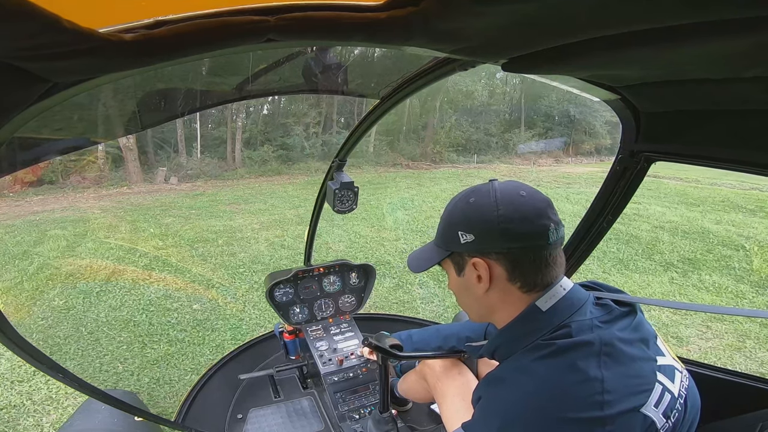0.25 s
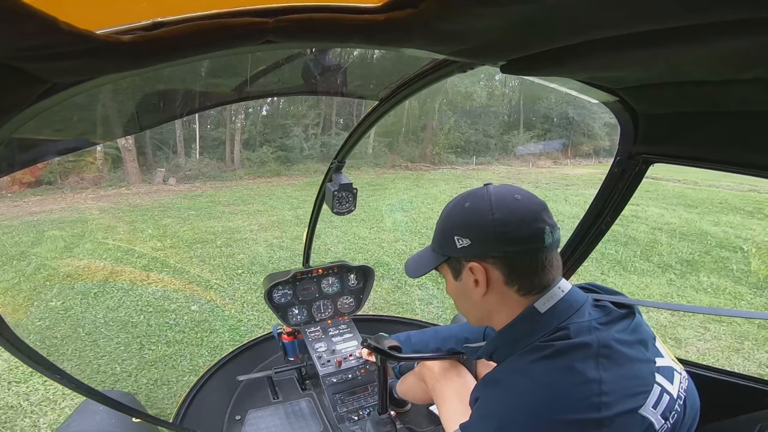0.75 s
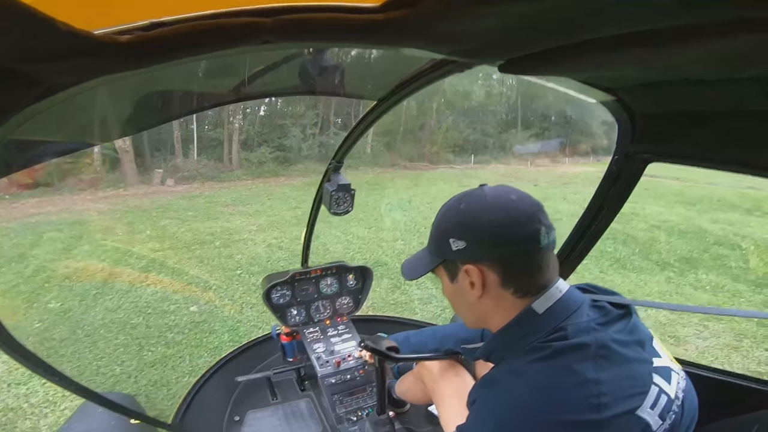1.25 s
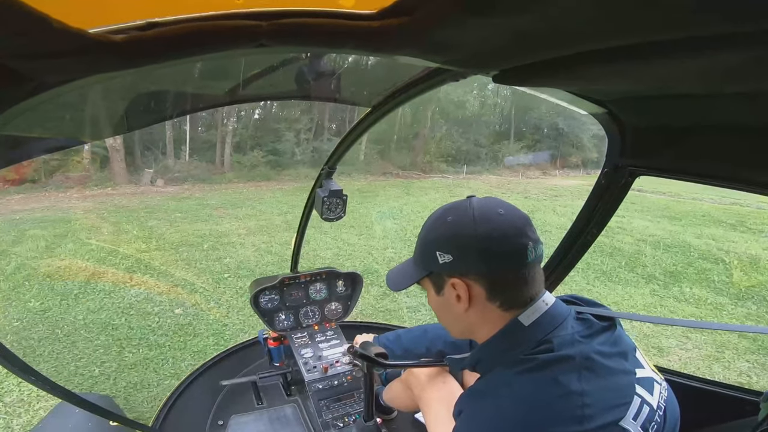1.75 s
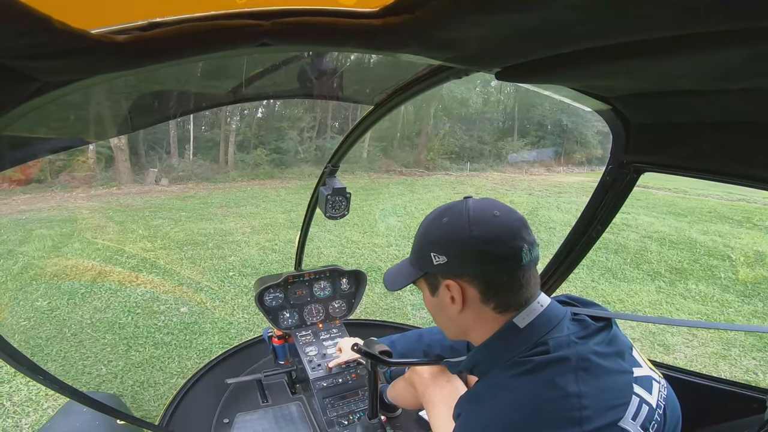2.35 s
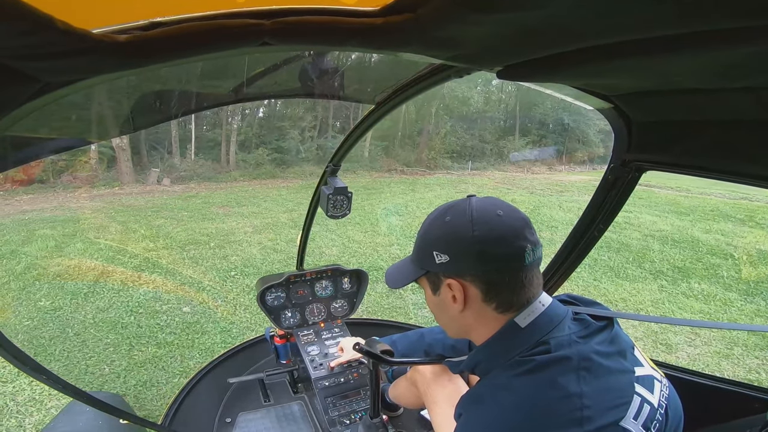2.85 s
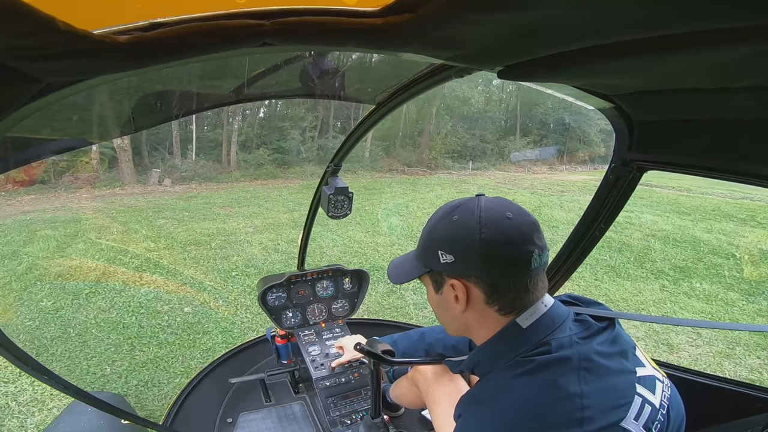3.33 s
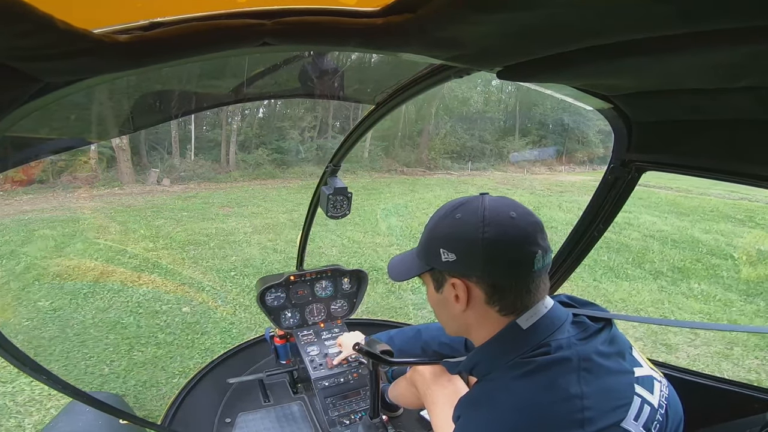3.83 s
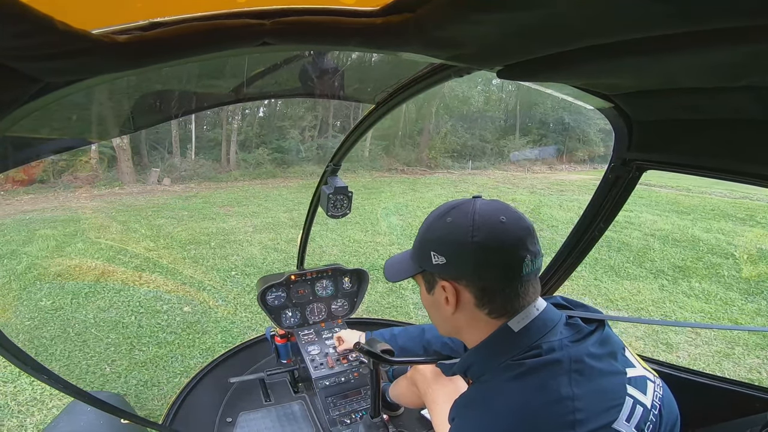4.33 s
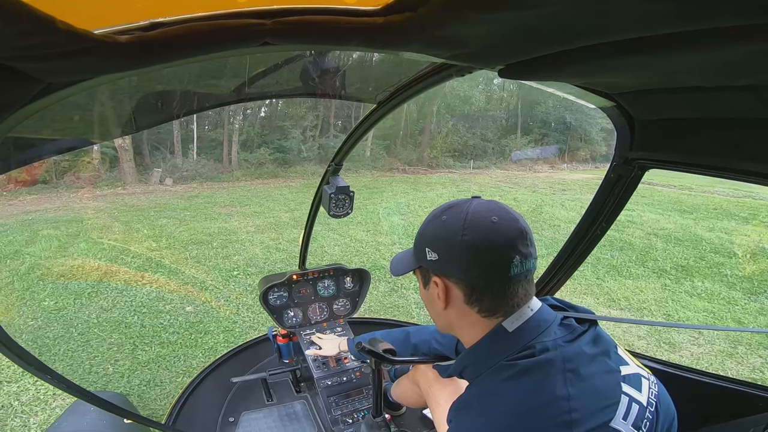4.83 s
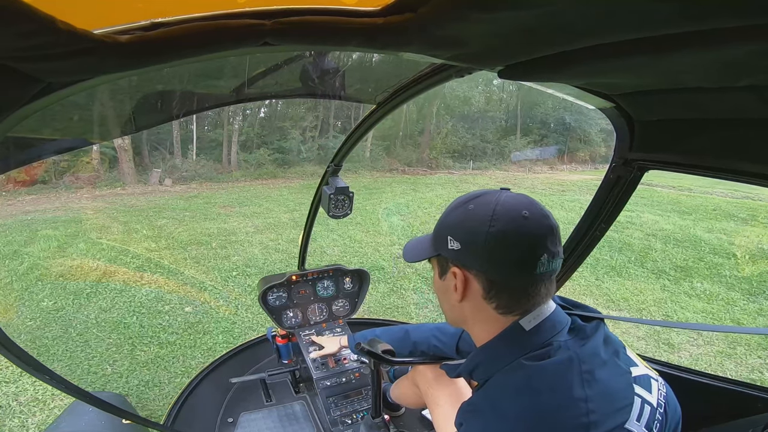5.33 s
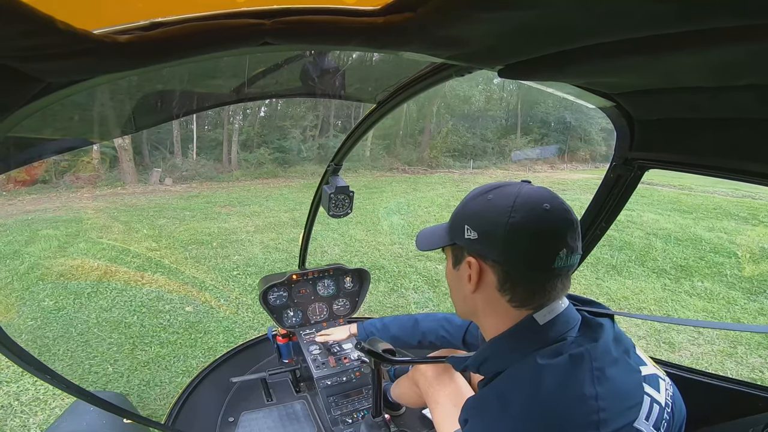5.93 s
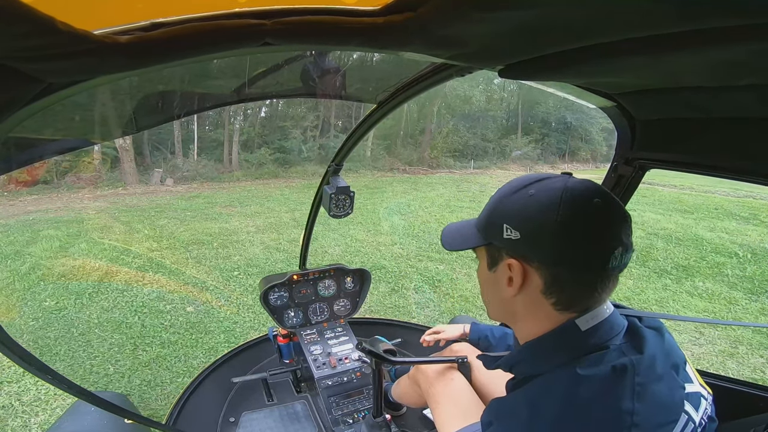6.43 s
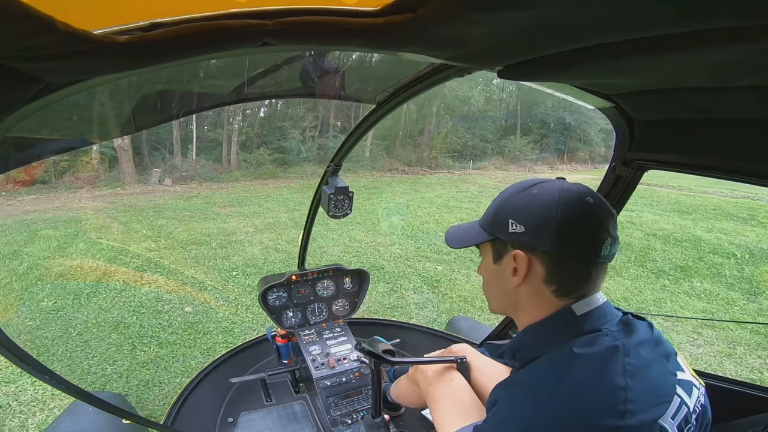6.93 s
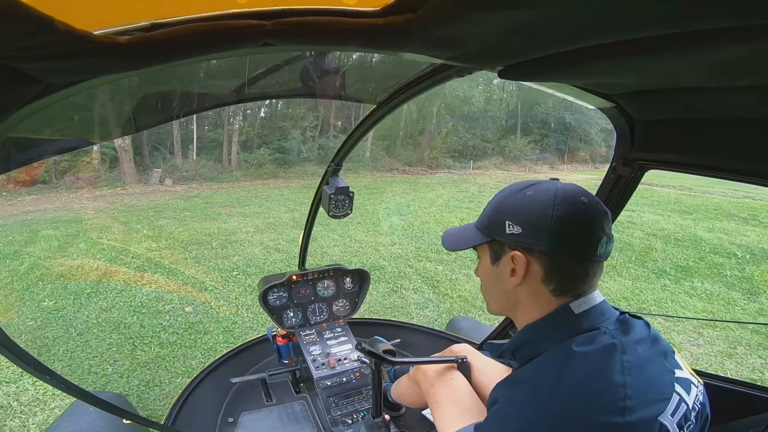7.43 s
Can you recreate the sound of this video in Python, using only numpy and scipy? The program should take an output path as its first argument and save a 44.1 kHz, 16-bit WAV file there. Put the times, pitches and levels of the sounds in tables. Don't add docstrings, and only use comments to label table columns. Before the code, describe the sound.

Inside a small helicopter cabin, a starter grinds through uneven thumping firings, then the piston engine catches into a droning, rattling idle with switch snaps.

```python
import sys
import numpy as np
from scipy import signal
from scipy.fft import rfft, irfft
from scipy.io import wavfile
from scipy.ndimage import uniform_filter1d

SR = 44100
rng = np.random.default_rng(int(sys.argv[2]) if len(sys.argv) > 2 else 0)


def waveform_to_disk(signal):
    frames = np.transpose(np.atleast_2d(signal))
    scaled = np.clip(frames, -1, 1) * 32767
    samples = np.round(scaled).astype(np.int16)
    wavfile.write(sys.argv[1], SR, samples)


def convert_level_to_amplitude(level_db):
    exponent = np.asarray(level_db, float) / 20
    return 10 ** exponent


N = 338688
FREQ = np.arange(N // 2 + 1) * SR / N
TIME = np.arange(N) / SR
EARLY = TIME[:3 * SR]
TOP_HZ = 10300

# time_s, firing_rate_hz
ENGINE_SPEED = [(1.25, 22.02), (1.45, 31.37), (1.61, 41.1), (1.68, 44.6), (1.77, 46.71), (1.91, 47.56),
                (2.13, 49.2), (2.5, 48.25), (2.81, 45.7), (3.18, 44.3), (3.99, 43.65), (4.08, 44.29),
                (4.72, 43.79), (5.96, 43.56), (6.57, 43.28), (6.7, 42.64), (7.3, 42.45), (7.45, 42.07)]
# start_s, blow_db, cabin_ring_hz, bark_db
LONE_FIRINGS = [(.004, -6.5, 58.2, -28.5), (.04, -27, 54, -54), (0.146, -19, 71, -58),
                (0.198, -25.5, 58.3, -53), (.252, -18, 52.8, -45), (.396, -4, 76, -20),
                (.427, -5.5, 53.6, -26.5), (.539, -15.5, 55.3, -41), (0.67, -6.5, 74, -28.5),
                (.698, -8.5, 54, -29), (0.869, -4.5, 82, -18), (0.897, -9.5, 77, -30), (.948, -14, 62, -42),
                (1.016, -6, 76, -21), (1.076, -6.5, 66, -17.5), (1.139, -8, 55, -23),
                (1.178, -16.5, 60.5, -28.5), (1.244, -19, 58, -25), (1.32, -8, 50, -46),
                (1.376, -7.5, 60.6, -15), (1.455, -11, 60, -22.5), (1.51, -23.5, 52, -31.5)]
# pitch_hz, level_db (per Hz)
FRAME_TONE = [(88, -36), (150, 2), (218, -10), (304, -3), (426, -6), (536, -7), (896, -17.5), (1250, -21),
              (1720, -24), (2640, -28), (3760, -34), (7900, -43), (10300, -55.5), (13400, -87),
              (22000, -120)]


def columns(table):
    s, *rest = np.transpose(table)
    return [np.interp(TIME, s, c) for c in rest]


def shape(points):
    hz, db = np.transpose(points)
    return convert_level_to_amplitude(np.interp(np.log(np.minimum(FREQ + 1, TOP_HZ)), np.log(hz), db))


def band(lo_hz, hi_hz, order=4):
    low_edge = 1 + (lo_hz / (FREQ + 1)) ** (2 * order)
    high_edge = 1 + (FREQ / hi_hz) ** (2 * order)
    return (low_edge * high_edge) ** -.5


def colour(pair, gain):
    # pitch_hz, side_minus_mid_db
    side_tone = [(60, -18.5), (110, -20), (190, -25.5), (330, -18), (580, -10), (1020, 0.5), (1800, -4.5),
                 (3170, -7), (5590, -2), (9850, 3)]
    # pitch_hz, share (0 to 1, minus means early)
    lag_share = [(60, 0), (300, .3), (700, .7), (1100, 0.7), (1800, -.6), (3000, .3), (9000, .3)]
    mid, other = rfft(pair) * gain
    hz, share = np.transpose(lag_share)
    share = np.clip(np.interp(np.log(FREQ + 1), np.log(hz), share), -1, 1)
    late = -1j * share * mid
    unrelated = np.sqrt(1 - share ** 2) * other
    side = irfft((late + unrelated) * shape(side_tone), N)
    mid = irfft(mid, N)
    return np.array([mid + side, mid - side]) / mid.std()


def ring(x, hz, t60):
    pole = np.exp(2j * np.pi * hz / SR - np.log(1000) / (t60 * SR))
    return signal.lfilter([1], [1, -pole], x).imag


def blows(s, gain):
    return np.bincount(np.clip(np.array(s) * SR, 0, N - 1).astype(int), gain, N)


def walk(rate):
    k = int(SR / rate)
    steps = np.repeat(rng.standard_normal(N // k + 1), k)
    return 1.17 * uniform_filter1d(uniform_filter1d(steps, k), k)[:N]


def once(turns, firing, fade):
    return np.exp(-((turns - firing) % 4) / fade)


def whole(x):
    return np.pad(x, (0, N - len(x)))


def gear_load():
    # bite_s, full_load_s, unload_s, grind_db, whistle_over_grind_db
    gear_bites = [
        (0.0, -0.003, -0.004, -56, -19),
        (0.308, 0.34, .45, -36.5, -13.5),
        (0.571, 0.615, .69, -38, -14.5),
        (0.779, 0.811, 0.843, -38, -16),
        (.87, 0.877, 0.885, -30.5, -29),
        (.96, 1.01, 1.289, -31, -15.5),
        (1.348, 1.354, 1.39, -40, -23),
        (1.37, 1.418, 1.63, -39, -28),
    ]
    bite_db, bite_db_per_s, unload_db_per_s = -10, 900, 331
    sag_db, treble_sag_db, shortest_sag_s = -8, -5.5, .1
    grind, treble, whistle = 0, 0, 0
    for bite_s, full_s, free_s, db, whistle_db in gear_bites:
        eased = np.maximum(EARLY - full_s, 0) / max(free_s - full_s, shortest_sag_s)
        before_db = -bite_db_per_s * np.maximum(bite_s - EARLY, 0)
        swell_db = np.interp(EARLY, [bite_s, full_s], [bite_db, 0])
        after_db = sag_db * eased - unload_db_per_s * np.maximum(EARLY - free_s, 0)
        gain = convert_level_to_amplitude(db + before_db + swell_db + after_db)
        grind = grind + gain
        treble = treble + gain * convert_level_to_amplitude(treble_sag_db * eased)
        whistle = whistle + gain * convert_level_to_amplitude(whistle_db)
    return whole(grind), whole(treble), whole(whistle)


def starter():
    # pitch_hz, level_db (per Hz)
    grind_tone = [(1060, -37), (1800, -12), (2190, 0.5), (2380, -4.5), (3470, -4), (3730, -12),
                  (4080, -8.5), (5260, -10.5), (5460, -10), (7810, -10), (10300, -21), (13400, -44),
                  (22000, -120)]
    # pitch_hz, level_db
    gear_pitches = [(3472, -7), (4200, -4), (5660, -5), (7120, -2), (7800, -7), (8786, -7)]
    off_s, fits_db = 1.7, 5.5
    grind_gain, treble_gain, whistle_gain = gear_load()
    peaks = 1 + sum(0.59 / (1 + ((FREQ - hz) / 60) ** 2) for hz, _ in gear_pitches)
    grind = colour(rng.standard_normal((2, N)), shape(grind_tone) * peaks) * convert_level_to_amplitude(2.05 * walk(89.9))
    low = irfft(rfft(grind) / (1 + (FREQ / 4800) ** 4), N)
    whistle = 0
    for hz, db in gear_pitches:
        level = convert_level_to_amplitude(db + fits_db * walk(14.8))
        whistle = whistle + level * np.sin(2 * np.pi * hz * np.cumsum(1 + .0015 * walk(120)) / SR)
    engaged = np.clip((off_s - TIME) / 0.082, 0, 1)
    return (low * grind_gain + (grind - low) * treble_gain + whistle * whistle_gain) * engaged


def pump():
    # time_s, level_db
    whine_level = [(0, -59), (.2, -68), (.44, -53), (.56, -62), (.7, -57), (1.3, -61), (1.6, -75)]
    pump_hz = 3133
    level = convert_level_to_amplitude(columns(whine_level)[0] + 2.0 * walk(5.6))
    return level * np.sin(2 * np.pi * pump_hz * np.cumsum(1 + .002 * walk(60)) / SR)


def clatter(turns, size=4096):
    cycles, keep, knock_db = turns / 4, .9, 1.5
    fresh = rng.standard_normal((2, 100, size))
    pattern = signal.lfilter([np.sqrt(1 - keep ** 2)], [1, -keep], fresh, axis=1)
    knocks = np.repeat(rng.standard_normal(16), size // 16)
    knocks = uniform_filter1d(knocks, size // 24, mode="wrap")
    pattern = (pattern * convert_level_to_amplitude(knock_db * knocks)).reshape(2, -1)
    return pattern[:, (cycles * size).astype(int) % pattern.shape[1]]


def shake(hz):
    crank_levels = [-26.5, -39, -38.5, -64, -42]
    jolt_levels = [-10.5, -11, -16.5, -32, -19]
    idle_levels = [-25.5, -30.5, -39.5, -44.5, -37]
    settle_shares = [.01, 0.62, .5, .05, 1.44]
    # time_s, level_db
    settling = [(3.2, 1.6), (4.8, 1), (5.05, -1.5), (6.3, -2.5), (7, -6)]
    idle_hz, runup_power, rumble_db_per_hz = 43.1, 1.6, -0.9
    crank_s, crank_rise_db_per_s, rest_db = 0.25, 115, -9
    jolt_rise_s, jolt_fall_s = 0.0091, 0.039
    catch_s, catch_rise_s = 1.335, 0.023
    crank = convert_level_to_amplitude(np.clip((TIME - crank_s) * crank_rise_db_per_s, rest_db, 0))
    s, blow_db, _, bark_db = np.transpose(LONE_FIRINGS)
    t = TIME[:16000]
    swell = 2 * (np.exp(-t / jolt_fall_s) - np.exp(-t / jolt_rise_s))
    blow, bark = (signal.fftconvolve(blows(s, convert_level_to_amplitude(db)), swell)[:N] for db in (blow_db, bark_db))
    run = np.minimum(hz / idle_hz, 1) ** runup_power * np.clip((TIME - catch_s) / catch_rise_s, 0, 1)
    settle_db = columns(settling)[0]
    layers = []
    for jolt, crank_db, jolt_db, idle_db, share in zip(
            [blow, bark, bark, bark, bark], crank_levels, jolt_levels, idle_levels, settle_shares):
        power = (crank * convert_level_to_amplitude(crank_db)) ** 2 + (jolt * convert_level_to_amplitude(jolt_db)) ** 2
        power = power + (run * convert_level_to_amplitude(idle_db + share * settle_db)) ** 2
        layers.append(10 * np.log10(power))
    layers[0] = layers[0] + rumble_db_per_hz * np.maximum(hz - idle_hz, 0)
    return layers


def airframe(turns, hz, loose=0.52):
    # pitch_hz, width_hz, boost_db
    panel_rings = [(269.3, 16, 6.5), (320.4, 20, 3.5), (354, 5.1, -3.5), (514, 51, 5), (640, 24, 1),
                   (991, 7.5, 6.5), (1257, 46, 12.5), (1359, 32, 11.5), (1512, 50, 9.5), (1631, 26, 8),
                   (1960, 150, 4), (2596, 28, 7), (3095, 130, 3.5)]
    cylinder_levels = [-1.5, -8.5, -5.5, 0]
    rumble_db, panel_db, sheet_db, fan_db, ringing_db = shake(hz)
    peaks = 1 + sum((convert_level_to_amplitude(db) - 1) / (1 + ((FREQ - f) / w * 2) ** 2) for f, w, db in panel_rings)
    gain = shape(FRAME_TONE) * peaks
    drive = clatter(turns) + loose * rng.standard_normal((2, N))

    stroke_db = np.interp(turns % 4, np.arange(5), cylinder_levels + cylinder_levels[:1])
    pulse_db = np.sin(2 * np.pi * turns)
    rattle_db = 0.19 * stroke_db + 0.5 * pulse_db + 4.5 * once(turns, 0.74, 0.14)
    panels = colour(drive, gain * band(146, 885)) * convert_level_to_amplitude(panel_db + rattle_db + 0.68 * walk(8.1))

    slow = np.clip((47 - hz) / 3, .2, 1)
    throb_db = slow * (8 * once(turns, 3.1, 1.1) - 2.4) + .8 * walk(8)
    sheet = colour(drive, gain * band(736, 2600))
    ringing = irfft(rfft(sheet) * band(1160, 1580, order=8) ** 2, N)
    sheet = (sheet - ringing) * convert_level_to_amplitude(sheet_db + 0.79 * walk(9)) + ringing * convert_level_to_amplitude(ringing_db + throb_db)

    fan = colour(rng.standard_normal((2, N)), gain * band(2450, 20000))
    fan = fan * convert_level_to_amplitude(fan_db + 0.36 * pulse_db + 0.58 * walk(14))
    rumble = colour(rng.standard_normal((2, N)), band(24, 106, order=2))
    rumble = rumble * convert_level_to_amplitude(rumble_db - 3.0 + 1.95 * walk(12))
    tappet_gain = band(4300, 8000, order=6) + 1.5 * band(7700, 8300, order=12)
    tappets = colour(rng.standard_normal((2, N)), tappet_gain) * once(turns, 1.9, 0.4)
    return panels + sheet + fan + rumble + tappets * convert_level_to_amplitude(fan_db - 8 + 1.5 * walk(24))


def thumps():
    # pitch_hz, level_db, t60_s
    cabin_rings = [(167, -11, 0.084), (319, -13.5, 0.05)]
    s, blow_db, ring_hz, bark_db = np.transpose(LONE_FIRINGS)
    ring_t60 = 0.33 * (54.8 / ring_hz) ** 2.7
    body = 0
    for t, db, hz, t60 in zip(s, blow_db, ring_hz, ring_t60):
        body = body + ring(blows([t], [convert_level_to_amplitude(db)])[:len(EARLY)], hz, t60)
    body = whole(body)
    for hz, db, t60 in cabin_rings:
        body += ring(blows(s, convert_level_to_amplitude(blow_db + db)), hz, t60)
    body = uniform_filter1d(uniform_filter1d(body, 70), 50)
    t = TIME[:4000]
    puff = t / 0.0089 * np.exp(1 - t / 0.0035) + 0.54 * np.exp(-t / 0.021)
    bark_gain = shape(FRAME_TONE) * band(150, 9000) * (FREQ / 500) ** 0.067
    bark = colour(rng.standard_normal((2, N)), bark_gain)
    return -body + bark * signal.fftconvolve(blows(s, convert_level_to_amplitude(bark_db)), puff)[:N]


def whistles():
    # start_s, level_db, first_hz, last_hz, length_s
    breathy_tones = [
        (0.026, -47, 1354, 1350, .07),
        (0.243, -34.5, 1270, 1263, 0.12),
        (.52, -41, 1256, 1255, 0.14),
        (0.38, -29, 1650, 888, 0.083),
        (.655, -31.5, 1660, 1400, 0.041),
        (0.691, -29, 1208, 695, 0.039),
        (0.871, -25, 437, 1030, .04),
    ]
    out = 0
    for s, db, hz0, hz1, length in breathy_tones:
        along = np.clip((EARLY - s) / length, 0, 1)
        phase = 2 * np.pi * np.cumsum(hz0 + (hz1 - hz0) * along) / SR
        breath = 0.15 + walk(400)[:len(EARLY)]
        out = out + convert_level_to_amplitude(db) * np.sin(np.pi * along) ** 0.47 * breath * np.sin(phase)
    return whole(out)


def exhaust(turns, orders_db):
    # multiple (of the firing rate), level_db (under the third order)
    upper_tones = [(2.75, -12), (3.25, -12), (4, -18.5), (4.75, -20), (5.5, -18), (6, -18.5), (7, -16.5),
                   (7.25, -13), (8, -17.5), (10.5, -28), (12, -26.5), (12.75, -21), (14.25, -23.5)]
    skew = -.8
    tone = sum(convert_level_to_amplitude(db) * np.sin(2 * np.pi * (k + 1) * turns + skew) for k, db in enumerate(orders_db))
    tuned = uniform_filter1d(convert_level_to_amplitude(orders_db[2]), SR // 4)
    for multiple, db in upper_tones:
        level = tuned * convert_level_to_amplitude(db + 2.3 * walk(5))
        tone += level * np.sin(2 * np.pi * (multiple * turns + rng.random()))
    return np.sqrt(2) * tone * np.clip((TIME - ENGINE_SPEED[0][0]) / 0.037 + 1, 0, 1)


def snaps():
    # start_s, peak_db, left_minus_right_db, ring_hz, t60_s
    clicks = [
        (1.3445, -28, -6, 5030, 0.023),
        (1.4124, -13.5, 0, 7800, 0.037),
        (3.5924, -19, 5, 5900, .09),
        (3.6474, -5.5, 2, 3510, 0.071),
        (4.1025, -17.5, -0.5, 7200, 0.066),
        (6.925, -35, 4, 8500, .04),
        (7.302, -37, 0, 8487, .04),
        (7.402, -29, 0, 9030, .04),
    ]
    out, t, fizz_gain = np.zeros((2, N)), TIME[:4000], .36
    for s, db, pan_db, hz, t60 in clicks:
        noise = rng.standard_normal((3, len(t)))
        tick = noise[0] * np.exp(-t / 0.0011) * 0.66
        tick = tick + np.sin(2 * np.pi * hz * t) * np.exp(-t / 0.0017) * .5
        fizz_band = signal.butter(1, [hz / 2, min(hz * 2.4, 12000)], "band", fs=SR, output="sos")
        fizz = signal.sosfilt(fizz_band, noise[1:]) * convert_level_to_amplitude(-60 * t / t60)
        level = convert_level_to_amplitude(db + np.array([[pan_db], [-pan_db]]) / 2)
        i = int(s * SR)
        out[:, i:i + len(t)] += level * (tick + fizz_gain * fizz)
    return irfft(rfft(out) * band(2000, 6800, order=3), N)


def boom(turns):
    # time_s, boom_db
    weak_firings = [(3.273, -25), (3.403, -21), (3.85, -17), (4.309, -28), (4.484, -19), (4.755, -17.5),
                    (5.223, -45.5), (5.834, -31), (6.104, -19), (6.391, -37), (6.599, -11.5), (6.745, -6),
                    (7.131, -36), (7.359, -7.5)]
    boom_hz, width_hz, scatter_db = 66, 24.4, -29
    fired = np.flatnonzero((np.diff(np.floor(turns)) > 0) & (TIME[1:] > 1.5))
    habit = np.resize([0.74, -0.14, -0.049, 1.0], len(fired))
    excess = convert_level_to_amplitude(scatter_db) * (habit + rng.standard_normal(400)[:len(fired)])
    s, db = np.transpose(weak_firings)
    missed = fired[np.searchsorted(fired, s * SR - SR / 90)]
    t = TIME[:8001] - TIME[4000]
    swell = np.exp(-(np.pi * width_hz * t) ** 2 / 4) * np.cos(2 * np.pi * boom_hz * t)
    pushes = blows(fired / SR - .002, excess) + blows(missed / SR - .002, convert_level_to_amplitude(db))
    return signal.fftconvolve(pushes, swell, "same")


def scene():
    # firing_rate_hz, first_order_db, second_order_db, third_order_db
    cabin_answer = [(22, -40, -18.5, -27.5), (27.8, -27, -19.5, -21.5), (31.5, -37.5, -7.5, -36),
                    (37, -22, -15, -45), (40, -15.5, -16, -38), (42.15, -16.5, -22.5, -26),
                    (43.6, -15.5, -24, -25), (45.65, -12.5, -27, -31), (46.8, -13, -33, -27.5),
                    (47.3, -11.5, -42, -38), (49, -12, -48, -39)]
    hz = columns(ENGINE_SPEED)[0]
    at_hz, *answers = np.transpose(cabin_answer)
    orders_db = [np.interp(hz, np.sort(at_hz), db) for db in answers]
    turns = np.cumsum(hz * (1 + .004 * walk(4))) / SR
    engine = exhaust(turns, orders_db) + boom(turns) + thumps() + whistles()
    return engine + airframe(turns, hz) + starter() + pump() + snaps()


def top_cut(x):
    return signal.sosfilt(signal.butter(12, 15100, fs=SR, output="sos"), x)


def record(dry):
    above_db = -16
    dry = dry + convert_level_to_amplitude(-66.5) * rng.standard_normal((2, N))
    response = band(26, 20000, order=2) * (band(1.0, TOP_HZ, order=30) + convert_level_to_amplitude(above_db))
    dry = irfft(rfft(dry) * response, N)
    mix = np.tanh(0.82 * dry) / 0.96 + .0037
    return top_cut(mix)


dry = scene()
out = record(dry)
waveform_to_disk(out)
```